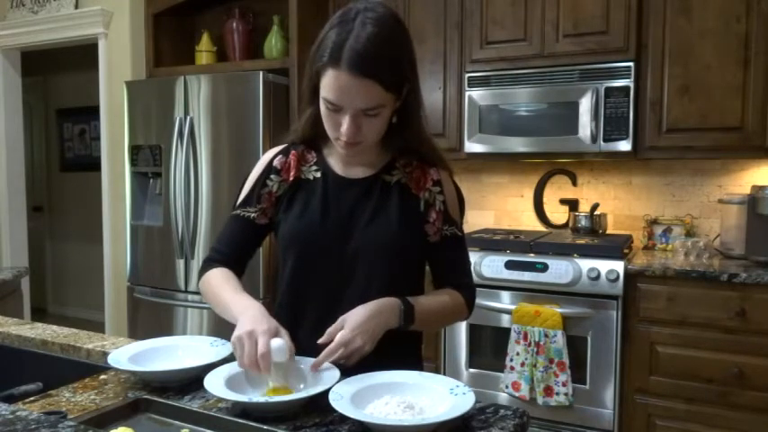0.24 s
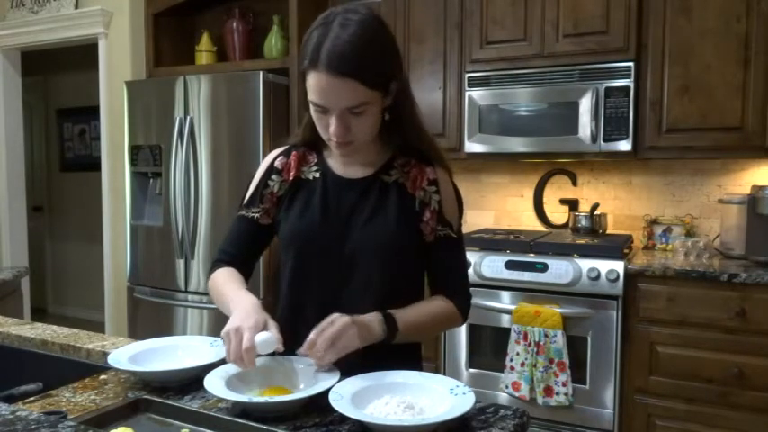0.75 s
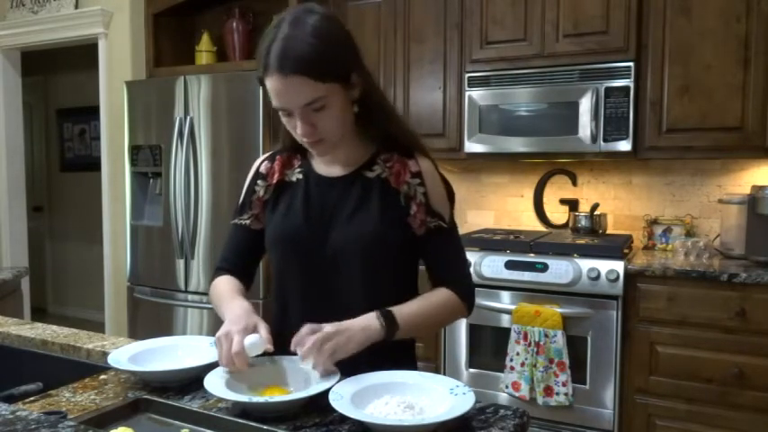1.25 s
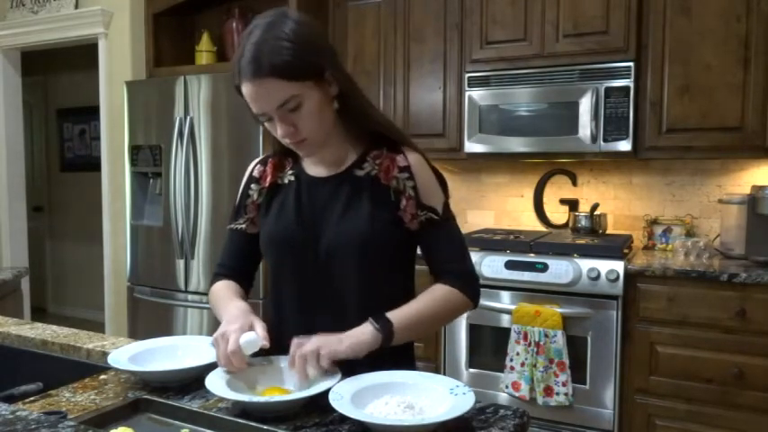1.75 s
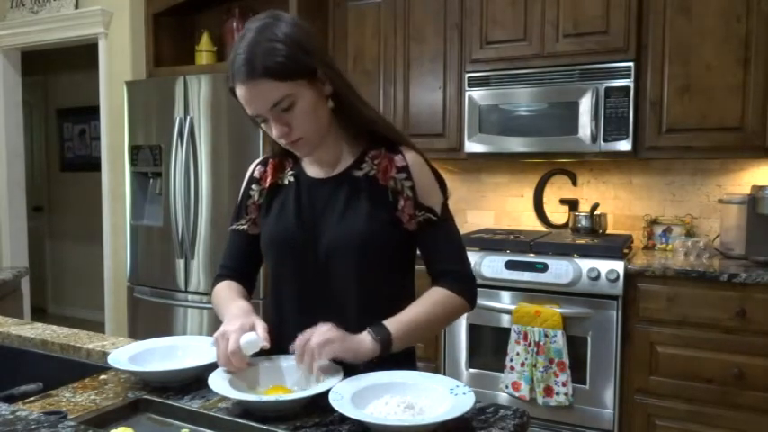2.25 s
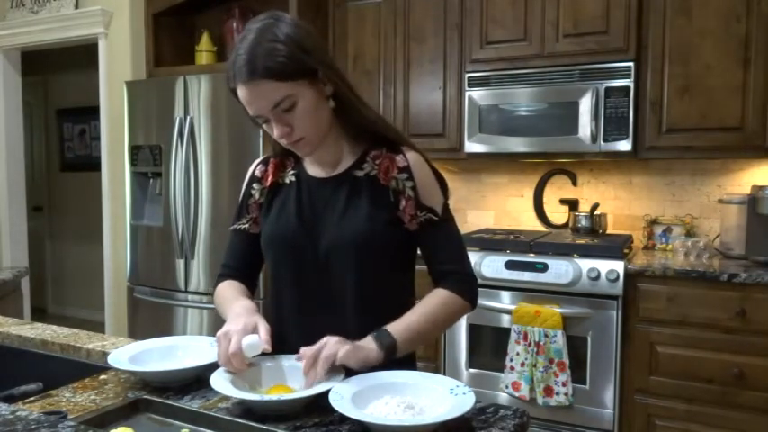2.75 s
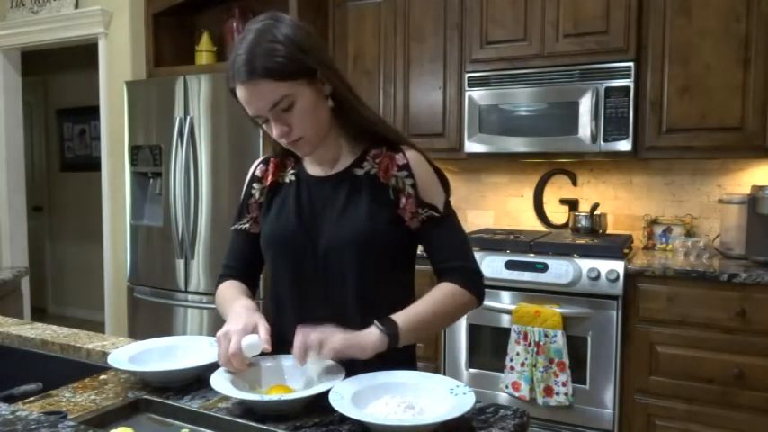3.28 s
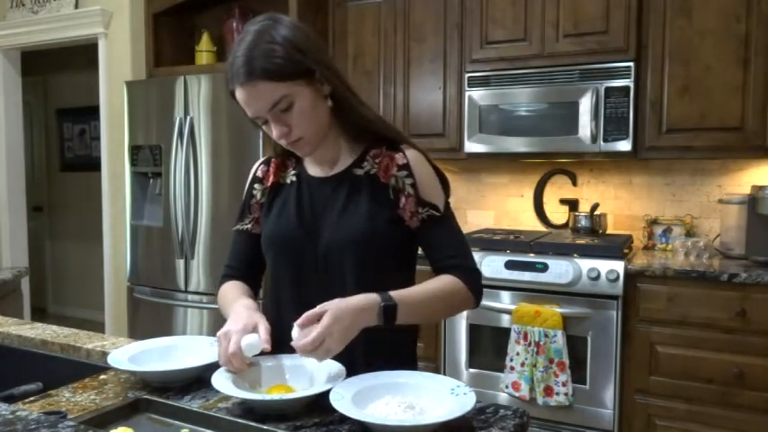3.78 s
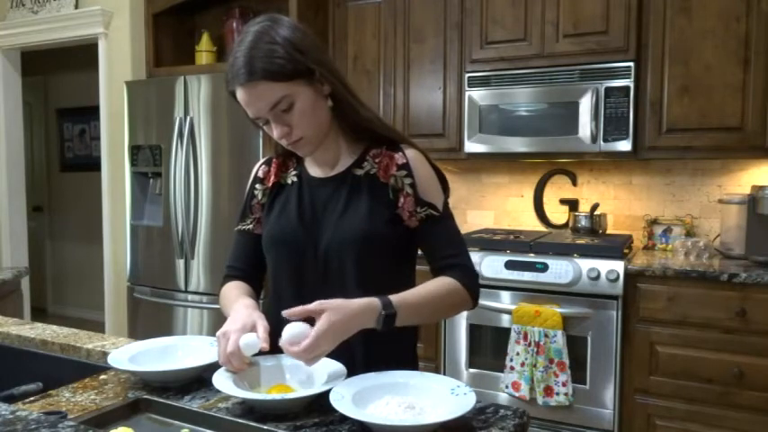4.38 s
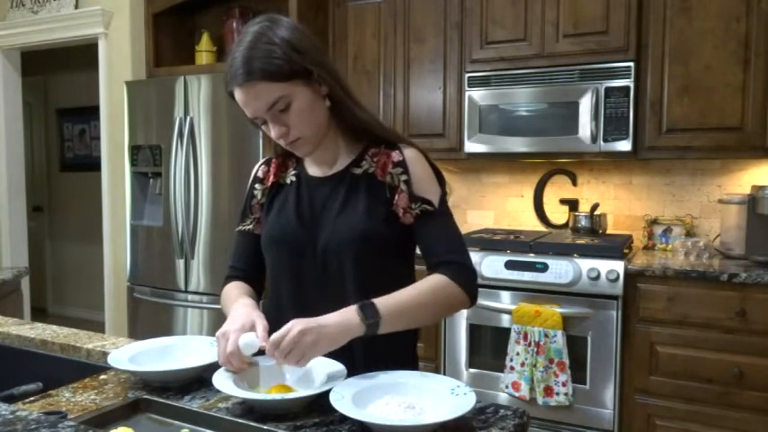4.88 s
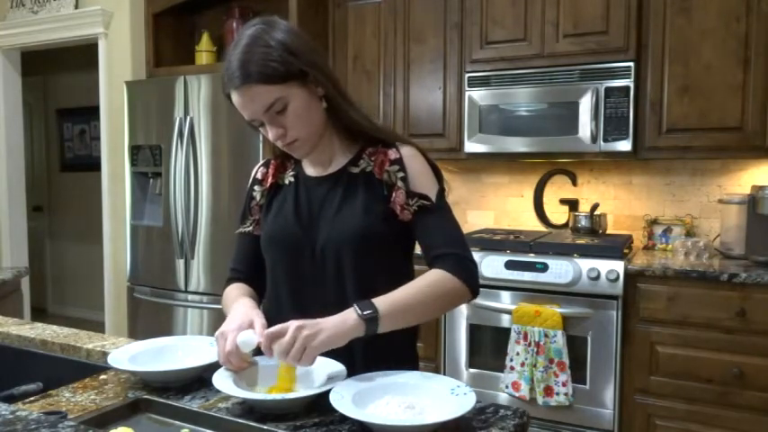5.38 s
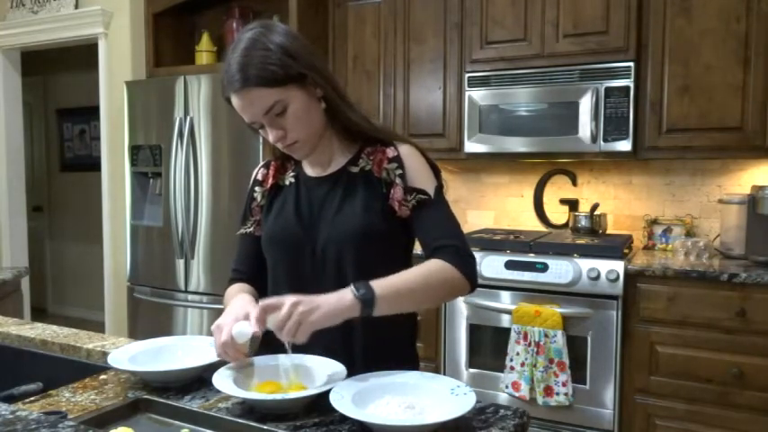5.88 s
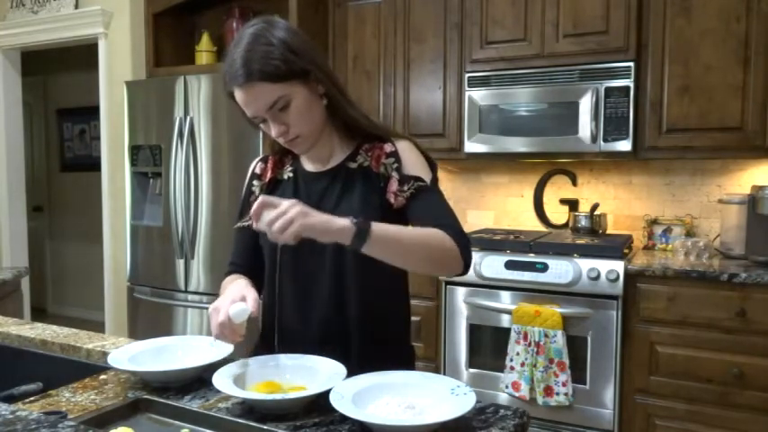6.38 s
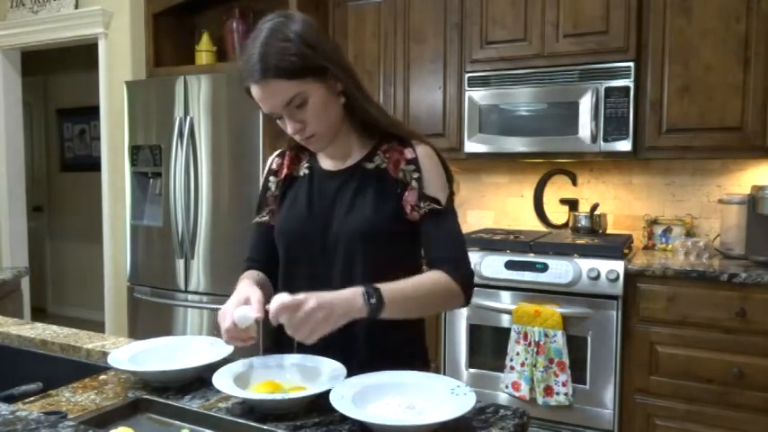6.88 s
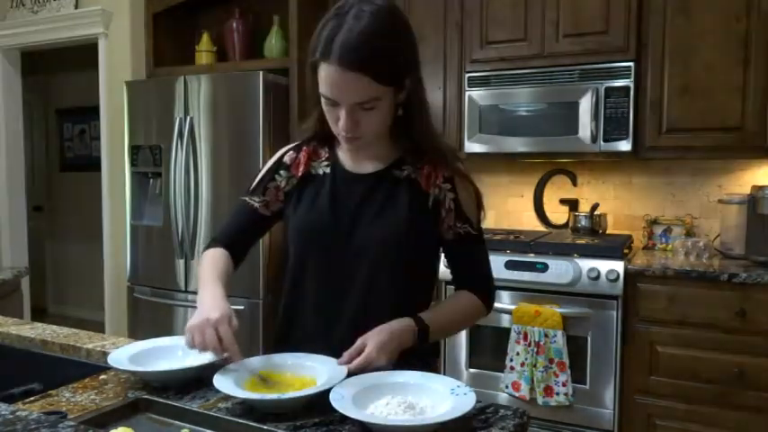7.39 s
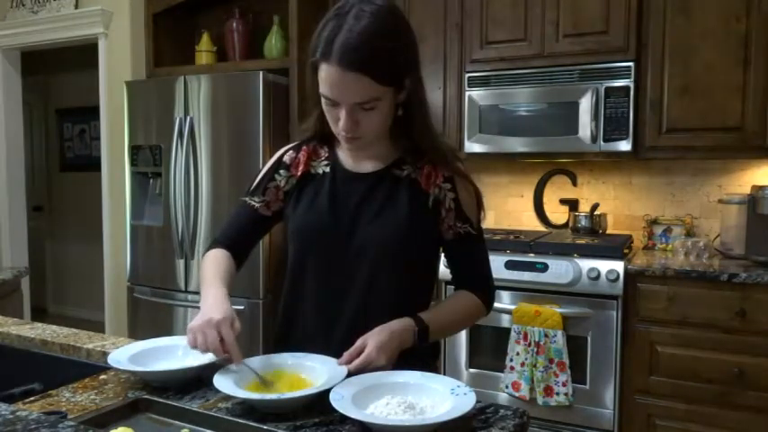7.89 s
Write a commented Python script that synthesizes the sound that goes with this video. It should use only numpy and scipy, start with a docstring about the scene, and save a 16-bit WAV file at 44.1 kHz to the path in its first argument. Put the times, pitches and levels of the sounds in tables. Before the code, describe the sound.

Brittle shell snaps, uneven knocks of egg on a chattering ceramic bowl, a second sharp crack, then brisk fork strokes clinking in a hard, live kitchen.

```python
"""Eggshell cracks and peels; then an egg is knocked on the rim of a ceramic bowl that rocks and chatters on a
stone counter, more shell breaks, and a fork beats the eggs and clinks on the bowl. Shell snaps are noisy bursts
of filtered pulses; the bowl is a thud, three sets of dying modes and a tick, driven by uneven contacts.
A hard, echoing kitchen answers, over room tone and an appliance hum; a limiter holds loud knocks down."""
import sys
import numpy as np
from scipy import signal
from scipy.io import wavfile
from scipy.ndimage import uniform_filter1d, minimum_filter1d

SR = 44100
rng = np.random.default_rng(int(sys.argv[2]) if len(sys.argv) > 2 else 0)


def master(y):
    """Save y as 16-bit WAV."""
    cut = np.clip(np.atleast_2d(y).T, -1, 1)
    pcm = np.round(cut * 32767)  # scale
    wavfile.write(sys.argv[1], SR, pcm.astype(np.int16))


N = 358929


def amp(db):
    """Gain of a level in dB."""
    return 10 ** (np.asarray(db) / 20)


def read(points, hz):
    """A table of (Hz, value) joined on a log-frequency axis."""
    f, value = np.transpose(points)
    return np.interp(np.log(hz + 1), np.log(f + 1), value)


def add(mix, start_s, sound):
    """Mixes sound in at start_s, cut at the end of the mix."""
    part = mix[..., round(start_s * SR):][..., :sound.shape[-1]]
    part += sound[..., :part.shape[-1]]


def pulse(colour_db, size=4096):
    """Minimum-phase pulse of peak 1 with spectrum colour_db(Hz): sudden, nothing before its start."""
    hz = abs(np.fft.fftfreq(size, 1 / SR))
    log_gain = np.log(amp(np.maximum(colour_db(hz), -100)))
    phase = -signal.hilbert(log_gain).imag
    h = np.fft.ifft(np.exp(log_gain + 1j * phase)).real[:size // 2]
    return h / abs(h).max()


def ring(pitches_hz, modes):
    """Dying sines of one struck body; modes are (dB, t60 in s)."""
    t = np.arange(SR // 2) / SR
    return sum(amp(db - 60 * t / t60_s) * np.sin(2 * np.pi * hz * t)
               for hz, (db, t60_s) in zip(pitches_hz, modes))


def bounces(chatter_s, per_s, crunch_s, gritty):
    """A contact of size 1 that crunches with decay crunch_s, then uneven contacts that die out."""
    chance, size = rng.random((2, 4000))
    t = np.arange(4000) / SR
    uneven = 2 * size - 1
    grit = uneven * np.exp(-t / crunch_s)
    chatter = (chance < per_s / SR) * uneven * np.exp(-(t / chatter_s) ** 2)
    return np.r_[1, gritty * (grit / np.linalg.norm(grit) + chatter)]


def snap(centre_hz, spread_oct):
    """A break in the shell: broad round its centre, cut more steeply below."""
    def colour_db(hz):
        octaves = np.log2((hz + 1) / centre_hz) / np.where(hz > centre_hz, 1, .6)
        return -12 * (octaves / spread_oct) ** 2
    return pulse(colour_db, size=1024)


def shells():
    """Cracks, hollow knocks and tiny random snaps; returns direct sound and the smoother sum for the room."""
    # An empty half shell is knocked. Each row: start in seconds, level in dB.
    shell_knocks = [(0.002, -31.5), (0.041, -31.5), (0.046, -28.5), (0.055, -36), (0.086, -52),
                    (0.153, -38), (5.462, -42), (6.441, -43)]
    # Shell cracks and ticks, with a dying ring at the start and one soft low thud.
    # Each row: start in seconds, level in dB, centre in Hz, spread in octaves.
    cracks = [(0.002, -32, 3650, 0.11), (0.034, -26, 4900, 2), (0.04, -11, 3960, 2),
              (0.046, -13.5, 7200, 0.77), (0.055, -23.5, 2740, 0.84), (0.086, -21, 3950, 1.8),
              (0.105, -27, 5500, 1.2), (0.156, -26, 3330, .8), (0.192, -34, 4200, 1.5),
              (0.219, -26, 4050, 1.5), (0.314, -22, 3520, 2.26), (0.768, -48, 3000, 0.31),
              (0.797, -25, 3440, 2.2), (1.047, -34.5, 970, 1.03), (4.382, -62, 2750, 0.39),
              (4.465, -48, 3170, 0.68), (4.748, -52, 3770, 0.78), (4.841, -41.5, 3080, 0.78),
              (4.894, -27, 3800, 1.5), (4.905, -26, 3360, 2), (5.022, -34, 4540, 1.3),
              (5.107, -28, 4200, 1.2), (5.121, -28, 4440, 2), (5.160, -7.5, 2590, 2.58),
              (5.462, -32, 2290, 2.1), (5.475, -36, 2580, 1.46), (5.765, -49, 5540, 1.4),
              (6.306, -47, 3940, .95), (6.441, -36.5, 2190, 1.9), (6.758, -37, 2610, 2.2),
              (6.770, -36, 2200, 1.9), (6.917, -35.5, 2440, 1.2), (6.996, -36, 5000, .6),
              (7.048, -24.5, 6600, 0.25), (7.321, -21, 6340, .6)]
    # Fine crackle as fingers work the shell. Each row: peak time in seconds, RMS at peak in dB, fall in dB/s.
    peel = [(.02, -42.5, 165), (4.9, -55.5, 85), (7.04, -54.5, 900)]
    # Modes of the half shell: pitches in Hz; then each row: level in dB, t60 in seconds.
    hollow_hz = [1038, 1226, 896]
    hollow_modes = [(-5.5, 0.02), (1, 0.008), (-17.5, 0.16)]
    peel_rise_db_per_s, crack_hollow_db = 180, -30.5
    near, far, hollow_drive = np.zeros((3, N))
    for start_s, db in shell_knocks:
        train = bounces(0.0037, per_s=200, crunch_s=0.0017, gritty=1.4)[1:]
        add(hollow_drive, start_s, amp(db) * train)
    for start_s, db, centre_hz, spread_oct in cracks:
        grit = bounces(0.0029, per_s=200, crunch_s=0.0037, gritty=1.12)[1:]
        shape = snap(centre_hz, spread_oct)
        add(near, start_s, amp(db) * np.convolve(grit, shape))
        add(far, start_s, amp(db) * shape)  # the room gets one clean snap, so its tail is smooth
        add(hollow_drive, start_s, amp(db + crack_hollow_db) * grit)  # every crack knocks the shell a little
    t = np.arange(N) / SR
    grain_db = 1.9 * np.minimum(rng.exponential(1, N), 3)
    grains = (rng.random(N) < 900 / SR) * rng.standard_normal(N) * amp(grain_db)  # 900 a second
    grains = signal.oaconvolve(grains, snap(centre_hz=4440, spread_oct=4.5))[:N]
    swell = sum(amp(db - np.maximum(peel_rise_db_per_s * (peak_s - t), fall * (t - peak_s)))
                for peak_s, db, fall in peel)
    rest = grains / grains.std() * swell
    rest += signal.fftconvolve(hollow_drive, ring(hollow_hz, hollow_modes))[:N]
    return near + rest, far + rest


def spread_out(mid, side, hz):
    """Left and right from a common and a difference spectrum; the bass stays near the middle."""
    # Diffuse sound. Each row: frequency in Hz, side minus mid in dB.
    width = [(60, -19), (140, -17), (350, -11.5), (830, -10), (2000, -7.5), (4800, -0.5), (11500, 4)]
    side = side * amp(read(width, hz))[:, None]
    return np.array([mid + side, mid - side])


def air():
    """Room tone: coloured noise with slowly drifting patches, under the hum of appliances as wavering sines."""
    # Room tone spectrum. Each row: frequency in Hz, relative density in dB per Hz.
    tone_colour = [(25, 6), (60, -12), (130, -6.5), (272, -6), (543, -8.5), (633, -10.5), (1400, -21.5),
                   (1720, -21), (2470, -23), (3270, -29.5), (7830, -35), (12000, -43)]
    # Course of the hum. Each row: time in seconds, RMS level in dB.
    hum_course = [(0, -89), (4.5, -85), (5.4, -68), (6.5, -64), (6.93, -57), (6.98, -72), (8.2, -55)]
    # Steady appliance tones. Each row: frequency in Hz, RMS level in dB.
    whine = [(533, -66.5), (254, -68), (602, -72)]
    hum_hz, tone_rms_db, patch_rms_db, speed_drift_rms = 130, -54, 3.1, 0.024
    frames, hz = N // 256 + 5, np.fft.rfftfreq(1024, 1 / SR)
    a, b, c, d, patches = rng.standard_normal((frames, 513, 5)).T
    patches = uniform_filter1d(uniform_filter1d(patches, size=6, axis=0), size=14, axis=1)
    colour_db = read(tone_colour, hz)[:, None] + patch_rms_db * patches / patches.std()
    z = spread_out(a + 1j * b, c + 1j * d, hz) * amp(colour_db)
    tone = signal.istft(z, nperseg=1024, noverlap=768)[1][:, :N]
    t = np.arange(N) / SR
    waver = uniform_filter1d(rng.standard_normal(N), size=8000)
    motor_s = t + np.cumsum(waver / waver.std()) * speed_drift_rms / SR  # the motor speed drifts a little
    hum = amp(np.interp(t, *np.transpose(hum_course))) * np.sin(2 * np.pi * hum_hz * motor_s)
    hum += sum(amp(db) * np.sin(2 * np.pi * tone_hz * motor_s) for tone_hz, db in whine)
    return amp(tone_rms_db) * tone / tone.mean(0).std() + np.sqrt(2) * hum  # sqrt(2): RMS to peak


def kitchen(sent, count=3):
    """Sparse reflections dying band by band; sets of reflections fade in and out over time."""
    # Each row: frequency in Hz, t60 in seconds.
    decay = [(150, 0.85), (400, 0.67), (1000, 0.93), (2800, 0.9), (5000, 0.71), (8000, 0.54), (11000, 0.52)]
    build_up_s, turns_hz = 0.0013, 2.3
    out, t = np.zeros((2, N)), np.arange(N) / SR
    for k in range(count):
        taps = np.zeros((2, SR))
        at = np.arange(120, SR - 20, 20) + rng.integers(0, 20, (2, (SR - 121) // 20))
        np.put_along_axis(taps, at, rng.choice([-1., 1.], at.shape), 1)
        hz, s, z = signal.stft(taps, SR, nperseg=256)
        fade = amp(-60 * s / read(decay, hz)[:, None]) * (1 - np.exp(-s / build_up_s))
        tail = signal.istft(spread_out(*z, hz) * fade, SR, nperseg=256)[1]
        tail /= np.linalg.norm(tail.mean(0))
        turn = np.sqrt(2 / count) * np.cos(2 * np.pi * turns_hz * t + np.pi * k / count)
        out += signal.fftconvolve((sent * turn)[None], tail, axes=1)[:, :N]
    return out


def bowl_rings():
    """Rings of the bowl's belly, lowest rim mode, higher rim modes and foot."""
    # Pitches in Hz.
    belly_hz, rim_hz, foot_hz = [813, 1039, 1304, 1608, 1780, 2180], [3075, 4025, 4345, 4755, 5608, 7531, 7886, 9243, 10850], [3992, 4016, 4338, 4380, 5062, 5830, 5878,
                                                                   7483, 9550, 9770, 10460, 10610]
    # Modes at those pitches. Each row: level in dB, t60 in seconds.
    belly, rim, foot = [(-18, 0.28), (-4.5, 0.048), (0, .075), (-14, 0.16), (-21, 0.087), (-24, 0.027)], [(7, 0.069), (-17, 0.26), (-21, 0.042), (-13.5, 0.2), (-6, .05),
                                       (-14, .16), (-11, .14), (-19, 0.074), (-28, 0.025)], [(-7, .16), (-8, .14), (-4, .15), (0, .16), (-14, .22),
                                                    (-9, .14), (-9, .15), (-20, .2), (-27, .2), (-23, .2),
                                                    (-23, .2), (-28, .2)]
    low_rim, high_rim = ring(rim_hz[:1], rim[:1]), ring(rim_hz[1:], rim[1:])
    return ring(belly_hz, belly), low_rim, high_rim, ring(foot_hz, foot)


def bowl(blows, thud_colour, rings, echo_db, gritty):
    """Every blow drives a thud, three sets of modes and a tick; returns direct sound and what the room gets."""
    thud = pulse(lambda hz: read(thud_colour, hz))
    tick = pulse(lambda hz: -14 * np.log2((hz + 1) / 7500) ** 2)
    drive = np.zeros((5, N))
    for start_s, thud_db, *rings_db, tick_db, chatter_s in blows:
        train = bounces(chatter_s, per_s=900, crunch_s=0.0017, gritty=gritty)
        add(drive[0], start_s, amp(thud_db) * np.r_[.45, train[1:]])  # the thud builds up from the crunch
        add(drive[4], start_s, amp(tick_db) * train[1:200])  # from the first few milliseconds of crunch
        ring_train = np.r_[1, .3 * train[1:]]  # the first contact sets the ring
        add(drive[1:4], start_s, amp(rings_db)[:, None] * ring_train)
    parts = thud, *rings, tick
    sounds = np.array([signal.fftconvolve(d, p)[:N] for d, p in zip(drive, parts)])
    return sounds.sum(0), amp(echo_db) @ sounds


def egg_knocks(belly, low_rim, high_rim, foot):
    """The egg hits the rim and the tipped bowl drops back: thuds with belly, rim and foot ringing."""
    # Egg on rim. Each row: start in seconds, then levels in dB of thud, rim ring, tick.
    taps = [(1.538, -33, -55, -53), (1.714, 4.5, -25.5, -30.5), (1.903, 2, -29, -18.5),
            (2.092, -10, -26, -10), (2.298, -12.5, -32.5, -17.5), (2.52, -12, -28.5, -15.5),
            (2.745, -15, -24, -10.5), (3.32, -13.5, -32, -25), (4.001, -20.5, -35.5, -34)]
    # Bowl on counter. Each row: start in seconds, then levels in dB of thud, belly, rim and foot ring.
    landings = [(1.562, -11.5, -10.5, -21.5, -31.5), (1.75, -17, -12, -20, -21),
                (1.947, -6.5, -9, -22.5, -17), (2.04, -12.5, -20.5, -31.5, -26.5),
                (2.133, -4, -18, -25.5, -17), (2.339, -2, -16.5, -18, -14),
                (2.53, -29, -36.5, -16.5, -26.5), (2.557, -5, -12.5, -28, -23.5),
                (2.774, -8.5, -33.5, -34.5, -27.5), (3.358, 1, -17.5, -20, -11),
                (4.015, -14, -28.5, -41, -39)]
    # Bowl and counter under the blow. Each row: frequency in Hz, level in dB.
    thud_colour = [(50, -58), (150, -26.5), (300, -22), (520, -10), (850, -4), (1400, 2.5), (2100, -7),
                   (3000, -13), (4500, -15.5), (8000, -47.5), (12000, -72.5)]
    # Echo against direct in dB for thud, belly, rim, foot, tick: the bowl also sounds through the counter.
    echo_db = [-2.5, -1, -2.5, -0.5, -3]
    # tap rings and landing tick are relative to the thud
    tap_belly_db, tap_foot_db, tap_chatter_s = -18.5, -17.5, 0.026
    landing_tick_db, landing_chatter_s = -26.5, 0.029
    blows = [(start_s, db, db + tap_belly_db, rim_db, db + tap_foot_db, tick_db, tap_chatter_s)
             for start_s, db, rim_db, tick_db in taps]
    blows += [(start_s, db, *rings_db, db + landing_tick_db, landing_chatter_s)
              for start_s, db, *rings_db in landings]
    soft_rim = low_rim + amp(-18.5) * high_rim  # a soft egg wakes the high modes less than steel does
    return bowl(blows, thud_colour, [belly, soft_rim, foot], echo_db, gritty=0.9)


def fork_clinks(belly, low_rim, high_rim):
    """The fork strikes the wall and its tines skip along the bottom: slaps with belly and rim ringing."""
    # Fork on wall. Each row: start in seconds, slap level in dB, low rim ring level in dB.
    strokes = [(7.061, -18, -36.5), (7.207, -11.5, -23.5), (7.374, -11, -17.5), (7.511, -6, -24),
               (7.673, -12.5, -28), (7.848, -9, -26), (7.989, -9, -21)]
    # Tines on bottom. Each row: start in seconds, then levels in dB of slap, belly ring, high rim ring.
    skips = [(7.079, -28, -31, -35.5), (7.229, -32, -26, -24.5), (7.532, -30, -27, -32),
             (7.552, -15, -43, -30), (7.69, -17.5, -30, -31), (7.698, -40, -26.5, -35),
             (7.867, -16, -36, -32), (7.878, -32, -28, -33), (8.005, -16, -29.5, -27)]
    # Fork through the egg onto the bowl. Each row: frequency in Hz, level in dB.
    slap_colour = [(50, -37), (150, -28), (500, -10), (850, -11.5), (1500, -9), (2600, -21.5), (3600, -18),
                   (6000, -16), (9000, -23.5), (12000, -30.5)]
    # Echo against direct in dB for slap, belly, low rim, high rim, tick.
    echo_db = [-1, -1.5, -13.5, -3.5, -24]
    # belly and tick are relative to the slap, one rim set to the other
    stroke_belly_db, stroke_high_rim_db, stroke_tick_db, stroke_chatter_s = -20, 2, -6, 0.0078
    skip_low_rim_db, skip_tick_db, skip_chatter_s = -5, -9.5, 0.007
    blows = [(start_s, db, db + stroke_belly_db, rim_db, rim_db + stroke_high_rim_db,
              db + stroke_tick_db, stroke_chatter_s) for start_s, db, rim_db in strokes]
    blows += [(start_s, db, belly_db, rim_db + skip_low_rim_db, rim_db,
               db + skip_tick_db, skip_chatter_s) for start_s, db, belly_db, rim_db in skips]
    return bowl(blows, slap_colour, [belly, low_rim, high_rim], echo_db, gritty=1.0)


def wall_slap():
    """Short decaying noise: cupboards scatter the slap from the far wall."""
    wall = rng.standard_normal((2, 400)) * np.exp(-np.arange(400) / SR / 0.0022)
    wall = wall.mean(0) + .5 * (wall - wall.mean(0))  # much the same in both channels
    return wall / np.linalg.norm(wall[0])


def scene():
    """Direct sound a little to the left, a slap from the far wall, the echo of the room and its tone."""
    egg, egg_echo = shells()
    belly, low_rim, high_rim, foot = bowl_rings()
    knock, knock_echo = egg_knocks(belly, low_rim, high_rim, foot)
    clink, clink_echo = fork_clinks(belly, low_rim, high_rim)
    direct = (knock + clink + egg) * amp([[.6], [-.6]])
    sent = knock_echo + clink_echo + amp(0.5) * egg_echo
    slap = signal.oaconvolve(sent[None], wall_slap(), axes=1)
    add(direct, .046, amp(-12.5) * slap)
    return direct + kitchen(sent) + air()


def record(dry):
    """A limiter holds the loud knocks down and lets go quickly; then the bass cut and the band limit."""
    threshold_db, slope, detector_fall_db_per_s = -6.5, 0.87, 400.0
    bass_cut_hz, edge_hz, look_ahead = 128, 11250, 88  # look-ahead in samples
    peak_db = 20 * np.log10(abs(dry).max(0) + 1e-9)
    fall_db = np.arange(N) * detector_fall_db_per_s / SR
    held_peak_db = np.maximum.accumulate(peak_db + fall_db) - fall_db
    over_db = np.maximum(held_peak_db - threshold_db, 0)
    early_db = -minimum_filter1d(-over_db, size=look_ahead)  # it starts to duck ahead of the peak
    held = dry / amp(slope * uniform_filter1d(early_db, size=look_ahead))
    held = signal.sosfilt(signal.butter(2, bass_cut_hz, "high", fs=SR, output="sos"), held)
    band_limit = signal.firwin(401, edge_hz, window=("kaiser", 7), fs=SR)
    return signal.oaconvolve(held, band_limit[None], "same")


dry = scene()
out = record(dry)
master(out)
```